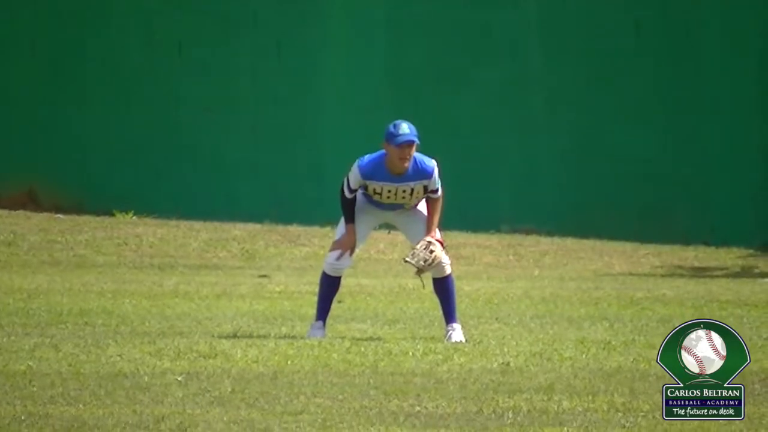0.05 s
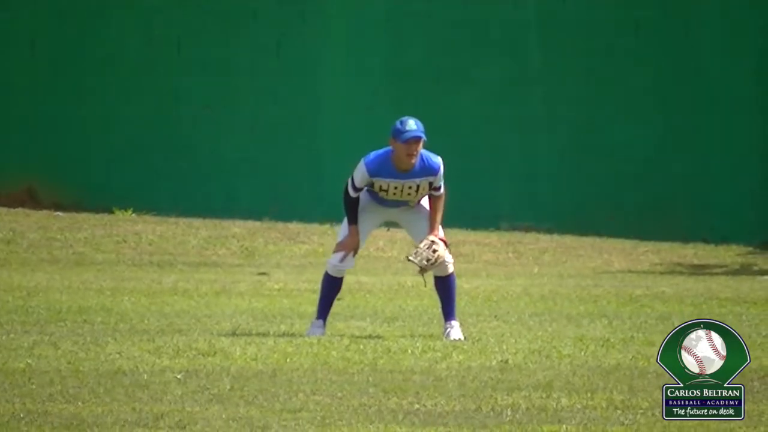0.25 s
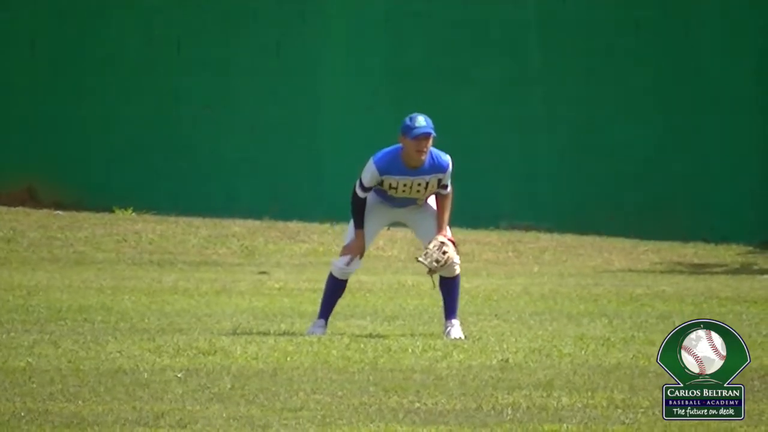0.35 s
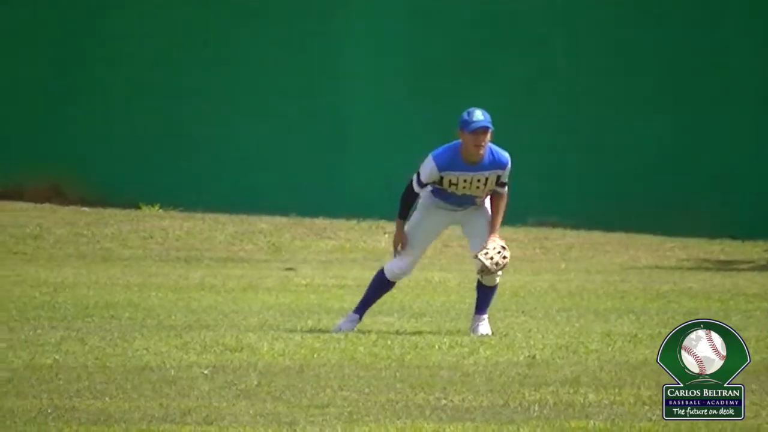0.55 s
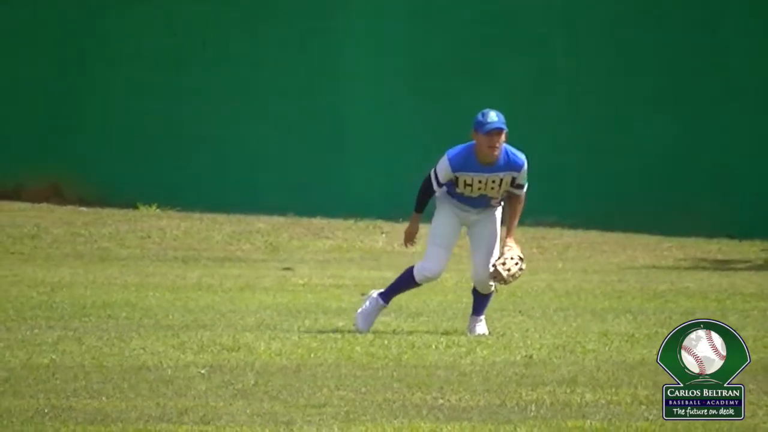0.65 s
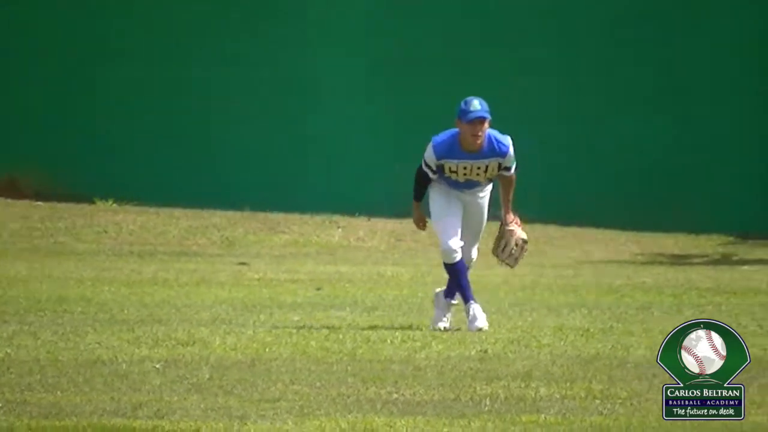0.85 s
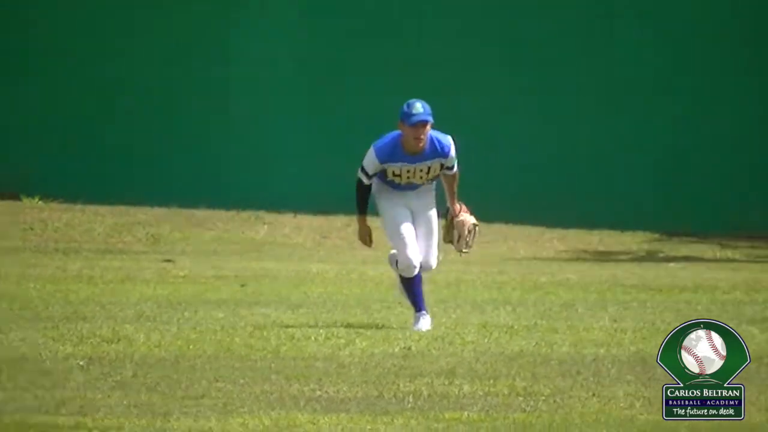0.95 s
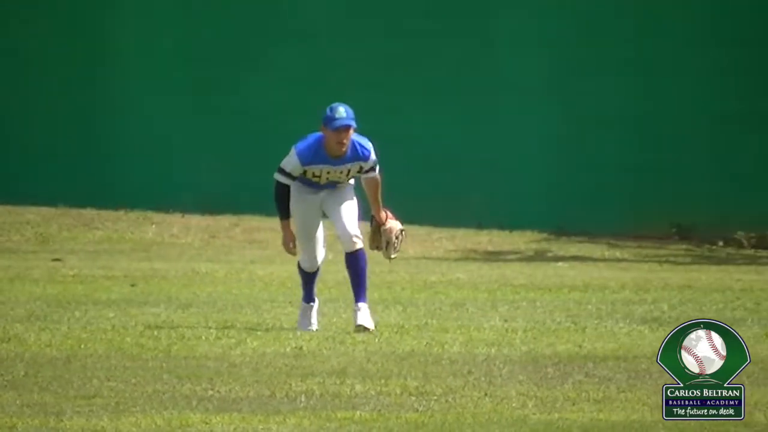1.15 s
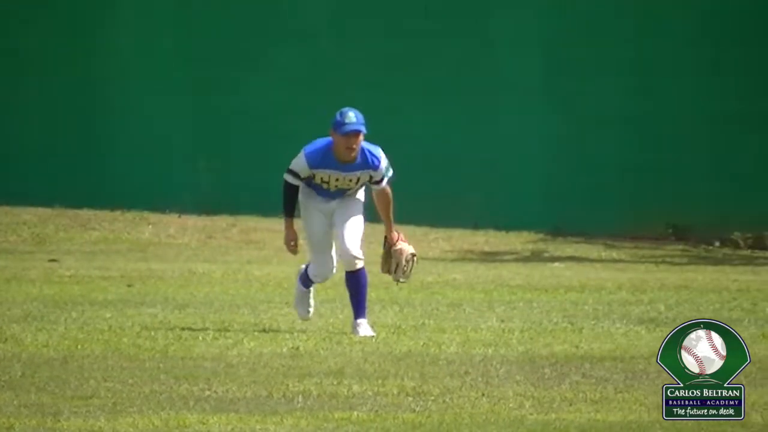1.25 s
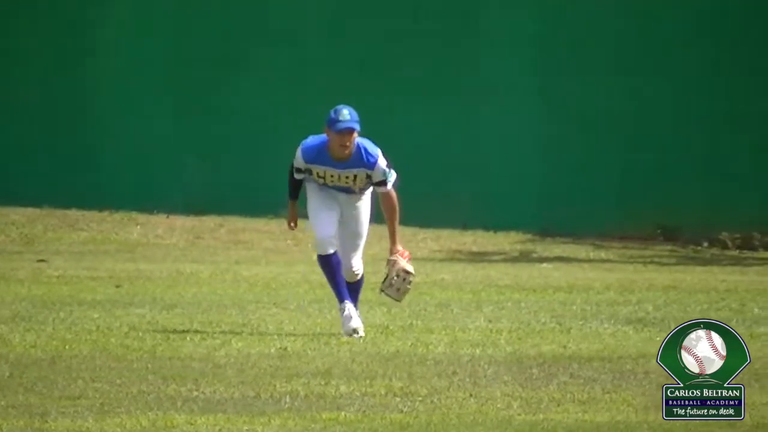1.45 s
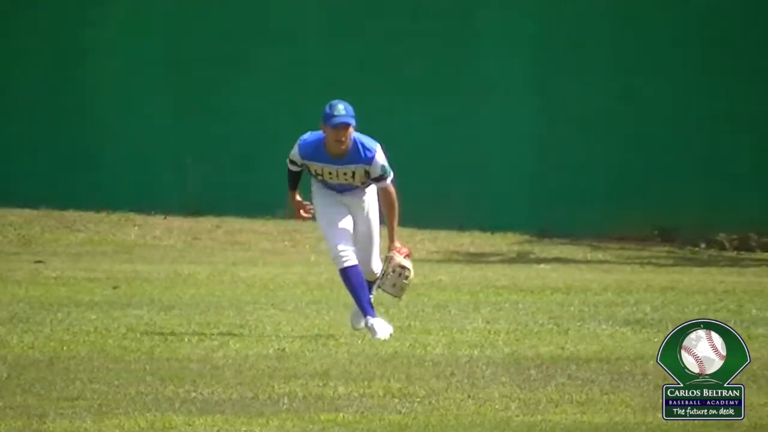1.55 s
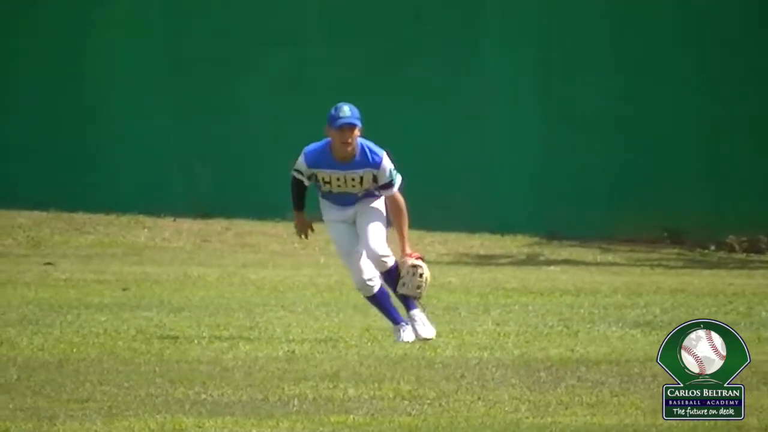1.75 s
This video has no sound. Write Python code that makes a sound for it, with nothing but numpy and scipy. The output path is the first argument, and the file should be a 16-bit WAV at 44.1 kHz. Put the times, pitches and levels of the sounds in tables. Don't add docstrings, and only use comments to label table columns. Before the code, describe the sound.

A loud, dry crack of a wooden bat on a baseball, close to the microphone, echoes off a fence and farther walls outdoors; then tiny gear ticks, faint shoe scuffs and one brief bird whistle over soft air.

```python
import sys
import numpy as np
from scipy import signal
from scipy.fft import rfft, irfft
from scipy.io import wavfile
from scipy.ndimage import uniform_filter1d

SR = 44100
rng = np.random.default_rng(int(sys.argv[2]) if len(sys.argv) > 2 else 0)


def volts(x):
    e = np.asarray(x, float) / 20
    return 10 ** e


def store_pcm(level_fs):
    pcm = np.round(np.clip(level_fs, -1, 1) * 32767).astype(np.int16)
    wavfile.write(sys.argv[1], SR, np.atleast_2d(pcm).T)


N = 79380
T = np.arange(N) / SR
OPPOSITE = np.array([[1], [-1]])


def conv(a, b):
    return signal.fftconvolve(a, b, axes=-1)[..., :N]


def shape(x, table):
    freq = np.maximum(np.fft.rfftfreq(N, 1 / SR), 1)
    hz, db = np.array(table).T
    return irfft(rfft(x) * volts(np.interp(np.log(freq), np.log(hz), db)), N)


def unit(x):
    return x / np.sqrt(np.mean(x ** 2))


def dull(x, hz):
    return signal.sosfilt(signal.butter(2, min(hz, SR / 2.2), fs=SR, output="sos"), x)


def thin(x, hz):
    return signal.sosfilt(signal.butter(2, hz, "high", fs=SR, output="sos"), x)


def walk(rate):
    k = int(SR / rate)
    steps = np.repeat(rng.standard_normal(N // k + 1), k)
    return unit(uniform_filter1d(uniform_filter1d(steps, k), k)[:N])


def pan(db):
    return volts(np.array([[db / 2], [-db / 2]]))


def decay(t, t60):
    return np.exp(-np.log(1000) * t / t60)


def ring(start, hz, t60):
    t = np.maximum(T - start, 0)
    return np.sin(2 * np.pi * hz * t) * decay(t, t60)


def spike(at):
    return np.sinc((T - at) * SR) * (np.abs(T - at) * SR < 16)


def crack():
    # start in seconds, level in dB, push or pull (sign).
    blows = [
        (.20103, -11.4, -1),
        (.201264, 0, 1),
        (.2019, -9.2, 1),
    ]
    # pitch in Hz, level in dB, 60 dB decay in seconds, polarity (signed gain).
    bat_modes = [(930, -11, .013, 1), (1402, -9.4, .0135, -1), (1988, -7.8, .0127, 1),
                 (2395, -11.9, .0137, -1), (3030, -4, .0051, 1)]
    ball_modes = [(2415, 5.1, .001, -1), (5197, -13.8, .0017, 1)]
    barrel_modes = [(338, -29, 0.0051, -1.8), (942, -34, 0.028, 0.95), (1376, -29, 0.045, -0.19),
                    (3630, -15.5, 0.0092, 1), (4120, -23.5, 0.0065, -1.05), (4910, -32.5, 0.0088, -1.13),
                    (7200, -24, 0.0035, -1.28), (10050, -24.5, 0.0029, 1), (13200, -30.5, .002, -1.2)]
    crack_db, radiates_hz, thin_hz, crack_top_hz = -.2, 500, 148, 14000
    rings = 0
    for start, force_db, way in blows:
        for hz, db, t60, sign in [*bat_modes, *ball_modes, *barrel_modes]:
            rings = rings + way * sign * volts(crack_db + force_db + db) * ring(start, hz, t60)
    return dull(thin(thin(rings, radiates_hz), thin_hz), crack_top_hz)


def field():
    # delay in seconds, level in dB, polarity (sign).
    fence = [(.0434, -34, -1), (.04406, -27, 1), (.04462, -20, 1), (.045, -25, 1), (.04644, -24, -1),
             (.0476, -33, -1), (.049, -33, 1)]
    # delay in seconds, level in dB, spread in seconds, top in Hz.
    rough_faces = [(.004, -31, 0.0055, 9000), (0.043, -30.5, 0.0035, 15000), (.049, -27.5, 0.02, 2980),
                   (.111, -42, .004, 4050), (0.1344, -23.5, 0.0023, 2490), (.139, -21, 0.0041, 1400),
                   (0.1475, -22.5, 0.0027, 5000), (.1515, -23, 0.0043, 3500), (0.17, -22.5, 0.0057, 1200),
                   (0.187, -32, .014, 3000), (0.2146, -30, 0.003, 9000), (0.2183, -21.5, 0.0063, 1180),
                   (.589, -34.5, 0.0032, 3500), (.63, -33.5, 0.0088, 1540)]
    # frequency in Hz, level in dB.
    sideways = [(300, 0), (700, 12), (1050, 6.5), (1500, -1.5), (3100, 1), (4100, 12.5), (5800, 12.5),
                (9000, -2)]
    taps_per_s, echo_wide, fence_sideways = 5000, 0.095, 0.73
    far_start_s, far_rise_s, far_t60_s, far_db, far_top_hz = 0.086, 0.13, .6, -31, 6000

    mirrors = sum(sign * volts(db) * spike(delay) for delay, db, sign in fence)
    mirrors = shape(mirrors, [(hz, fence_sideways * db) for hz, db in sideways])

    mid, side = rng.standard_normal((2, N)) * (rng.random(N) < taps_per_s / SR)
    taps = mid + echo_wide * side * OPPOSITE
    scattered = 0
    for delay, db, spread, top_hz in rough_faces:
        fade = np.exp(-np.maximum((T - delay) / spread, 0) ** 2)
        face = (taps + 2 * spike(delay)) * (T > delay - 1e-4) * fade
        scattered = scattered + volts(db) * dull(face / np.sqrt(np.sum(face ** 2) / 2), top_hz)

    mid, side = rng.standard_normal((2, N))
    t = np.maximum(T - far_start_s, 0)
    wash = (mid + 2 * echo_wide * side * OPPOSITE) * np.minimum(t / far_rise_s, 1) * decay(t, far_t60_s)
    wash = volts(far_db - 18.5) * dull(wash, far_top_hz)
    return mirrors + shape(scattered + wash, sideways)


def scuffs():
    # start in seconds, level in dB, length in seconds.
    slides = [
        (0.892, -51, 0.059),
        (0.97, -61, 0.051),
        (1.416, -53, 0.062),
    ]
    # frequency in Hz, level in dB.
    grit_colour = [(300, -32), (700, -15), (1200, -0.5), (2000, 3.5), (3000, -3.5), (4500, -5), (6000, -18),
                   (10000, -42)]
    attack_s, release_s, grit_per_s, grit_db = 0.011, .03, 17000, 1.3
    grains = rng.standard_normal(N) * (rng.random(N) < grit_per_s / SR)
    grains = grains * volts(grit_db * rng.exponential(size=N))
    env = 0
    for start, db, length in slides:
        attack = np.clip((T - start) / attack_s, 0, 1)
        release = np.exp(-np.maximum(T - start - length, 0) / release_s)
        env = env + volts(db) * attack * release
    return unit(shape(grains, grit_colour)) * env * volts(0.64 * walk(60))


def ticks():
    # start in seconds, level in dB, pitch in Hz, 60 dB decay in seconds.
    knocks = [
        (.4198, -33, 880, .03),
        (.7912, -37, 1450, .02),
        (.8172, -40, 1600, .012),
        (.9395, -38, 2500, .004),
        (1.0125, -38, 2500, .007),
        (1.029, -31, 1950, .009),
        (1.0438, -33.5, 1800, .013),
    ]
    total = 0
    for start, db, hz, t60 in knocks:
        total = total - volts(db) * (ring(start, hz, t60) + .5 * ring(start, 0.83 * hz, t60))
    return thin(dull(dull(total, 3200), 3500), 590)


def bird():
    # time in seconds, pitch in Hz, level in dB.
    whistle = [
        (1.55, 3147, -63),
        (1.559, 3461, -46),
        (1.567, 4095, -56),
        (1.578, 4780, -47.5),
        (1.587, 5050, -70),
        (1.596, 4680, -43),
        (1.602, 4260, -52.5),
        (1.63, 3450, -43.5),
        (1.645, 2650, -61),
    ]
    pan_db, flutter_db, echo_s, echo_db = 4.5, -0.5, 0.01, -10.5
    trees_db, trees_t60_s, trees_hold_s = -7.5, 0.35, 0.092
    s, hz, db = np.array(whistle).T
    gate = np.clip((T - s[0]) / 0.0045, 0, 1) * np.clip((s[-1] + .004 - T) / .004, 0, 1)
    level = volts(np.interp(T, s, db) + flutter_db * walk(180))
    phase = 2 * np.pi * np.cumsum(np.interp(T, s, hz)) / SR
    song = np.sqrt(2) * gate * level * np.sin(phase)
    direct = song + volts(echo_db) * conv(song, spike(echo_s))
    trees = rng.standard_normal((2, N)) * np.minimum(T / 0.016, 1)
    trees = trees * decay(np.maximum(T - trees_hold_s, 0), trees_t60_s)
    smear = conv(song[None], trees / np.sqrt(np.sum(trees ** 2) / 2))
    return direct * pan(pan_db) + volts(trees_db) * smear


def fan_hum():
    # frequency in Hz, level in dB.
    fan_lines = [(140, -78), (223, -80), (252, -81.5), (335, -73), (419, -75), (503, -74)]
    width_hz = 4.03
    hum = 0
    for hz, db in fan_lines:
        phase = 2 * np.pi * hz * T + walk(width_hz) + 6 * rng.random()
        hum = hum + volts(db + 2.6 * walk(width_hz)) * np.sqrt(2) * np.sin(phase)
    return hum


def air():
    # frequency in Hz, level in dB per Hz.
    air_colour = [(30, -42), (100, -19), (250, -8.5), (850, 0), (1600, -5), (3200, -12.5), (6300, -22.5),
                  (15000, -32)]
    # frequency in Hz, side over mid in dB.
    air_width = [(30, -3), (60, -6), (125, -11.5), (500, -12), (2000, -13), (5000, -9.5), (9000, -16.5),
                 (15000, -18)]
    # frequency in Hz, left over right in dB.
    air_lean = [(30, 6), (60, 3), (200, 2.2), (1000, 1.2), (15000, -0.7)]
    # time in seconds, level in dB.
    breeze = [(0, 0.5), (.3, 1), (.6, 0), (1.0, 0.5), (1.4, 0), (1.6, 0.5), (1.8, 1)]
    air_db, swell_db, flicker_db = -52, 0.28, 0.86
    mid, side = rng.standard_normal((2, N))
    spec = rfft(shape(mid + shape(side, air_width) * OPPOSITE, air_colour))
    octaves = np.log2(np.maximum(np.fft.rfftfreq(N, 1 / SR), 1))
    gust, swell = np.interp(T, *np.array(breeze).T), walk(2.2)
    total = 0
    for octave in range(4, 16):
        band = irfft(spec * np.clip(1 - np.abs(octaves - octave), 0, 1), N)
        gust_db = gust * (1 + abs(octave - 10) / 3)
        total = total + band * volts(gust_db + swell_db * swell + flicker_db * walk(12.2))
    left = shape(total[0], [(hz, db / 2) for hz, db in air_lean])
    right = shape(total[1], [(hz, -db / 2) for hz, db in air_lean])
    both = np.array([left, right])
    return volts(air_db) * both / np.sqrt(np.mean(both.mean(axis=0) ** 2))


def scene():
    hit = crack()
    bat_and_echoes = (hit + conv(hit[None], field())) * pan(2)
    ground = (ticks() + scuffs()) * pan(1.5)
    return bat_and_echoes + ground + bird() + air() + fan_hum()


def roll_off(x):
    return signal.sosfilt(signal.butter(12, 16550, fs=SR, output="sos"), x)


def record(dry):
    top_hz = 15550
    steep = signal.ellip(8, .1, 50, top_hz, fs=SR, output="sos")
    mix = signal.sosfiltfilt(steep, dry)
    return roll_off(mix)


dry = scene()
out = record(dry)
store_pcm(out)
```